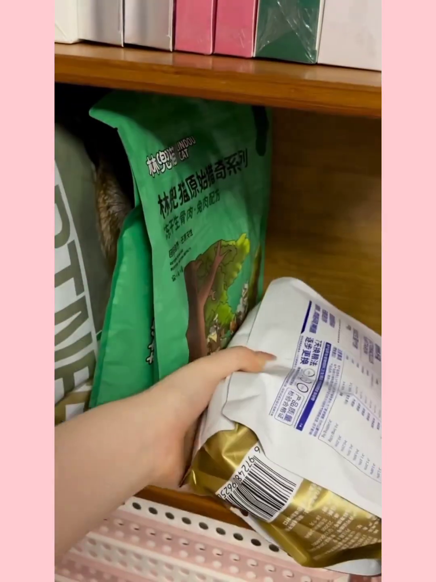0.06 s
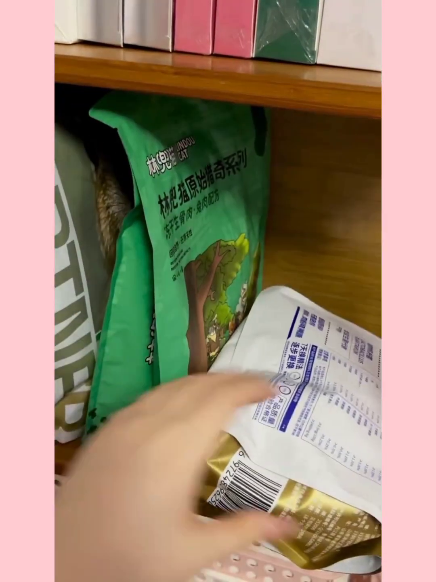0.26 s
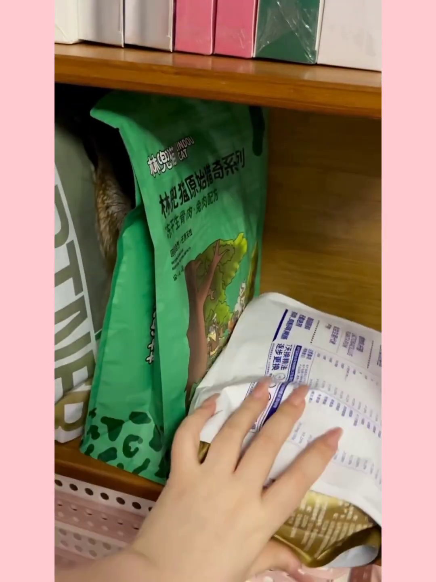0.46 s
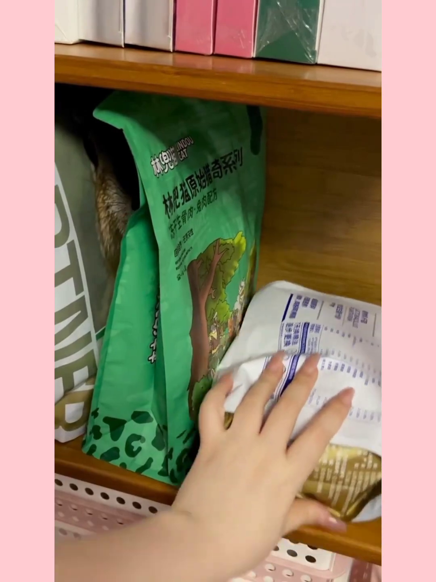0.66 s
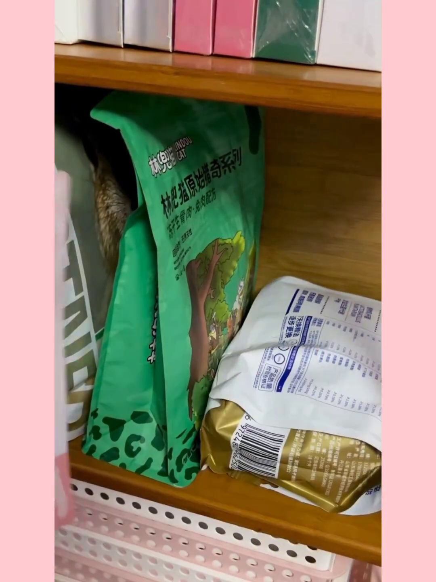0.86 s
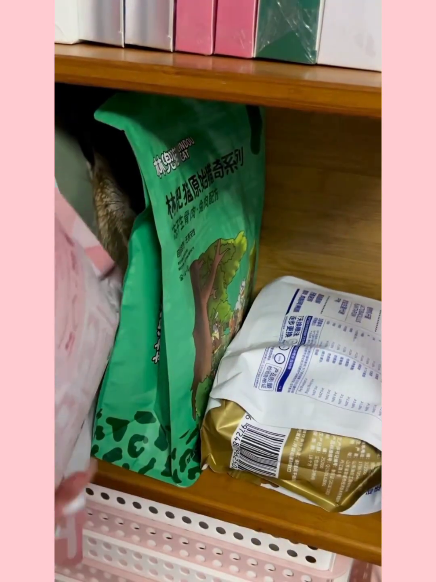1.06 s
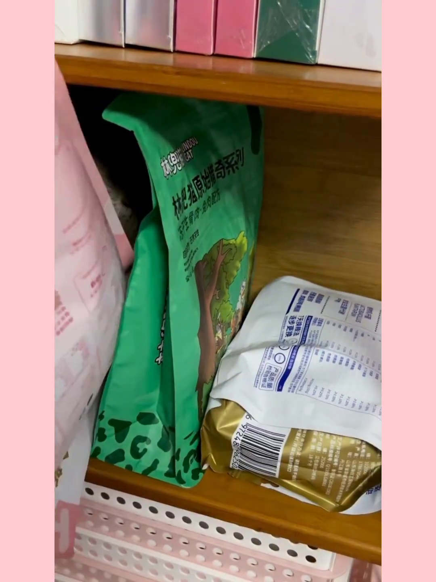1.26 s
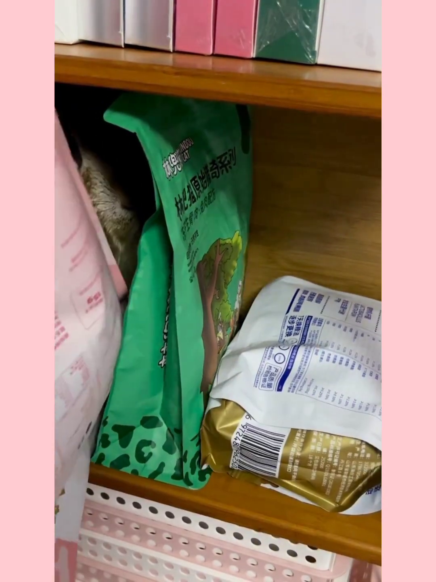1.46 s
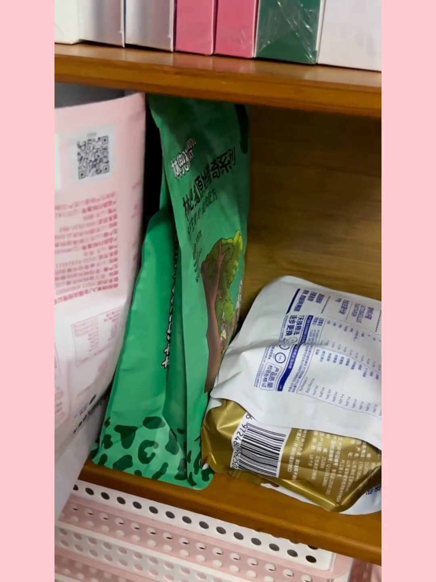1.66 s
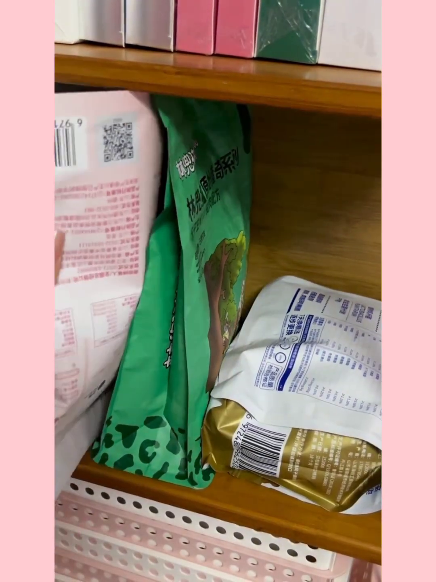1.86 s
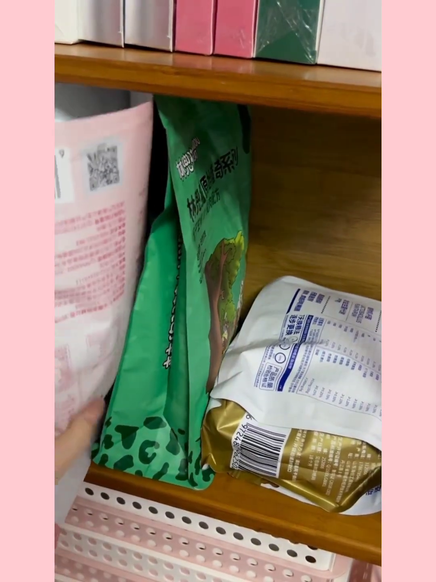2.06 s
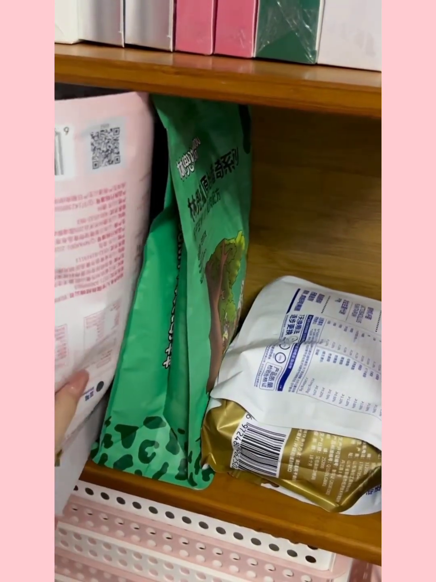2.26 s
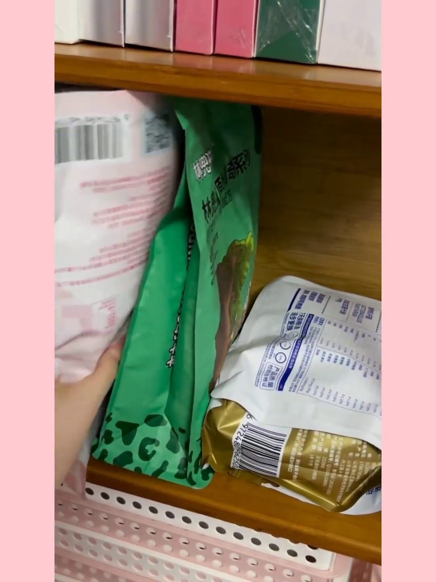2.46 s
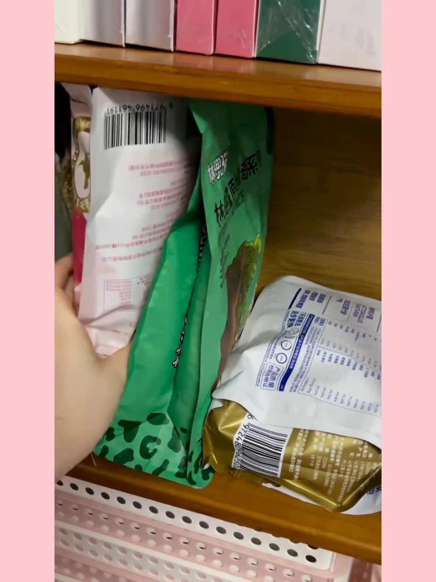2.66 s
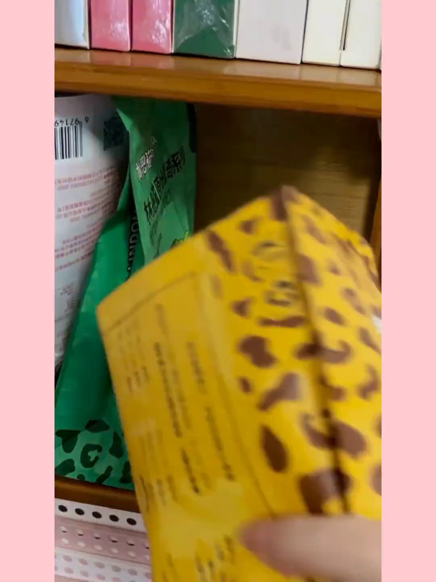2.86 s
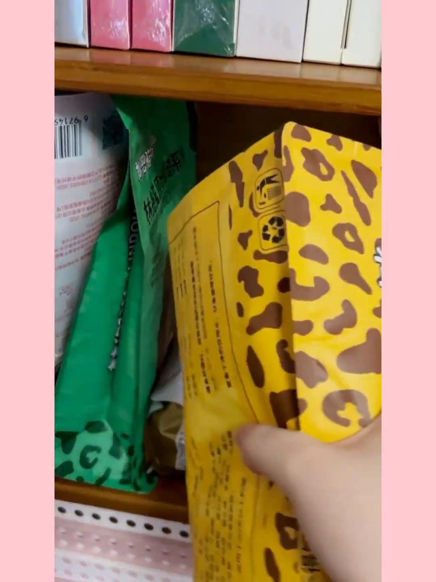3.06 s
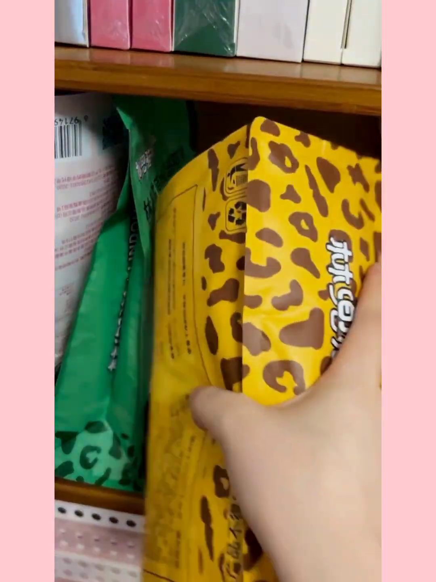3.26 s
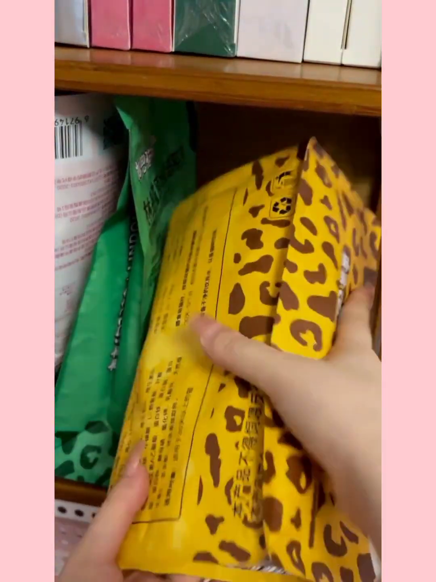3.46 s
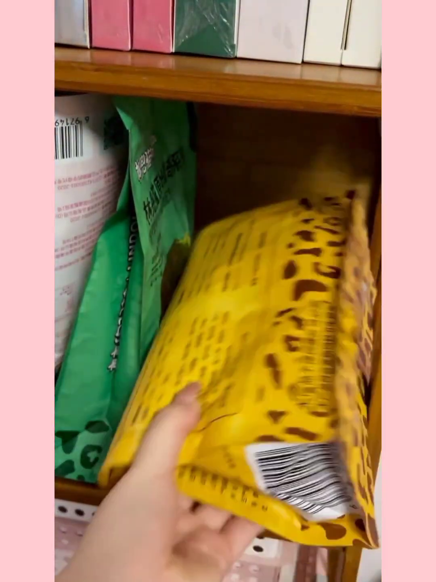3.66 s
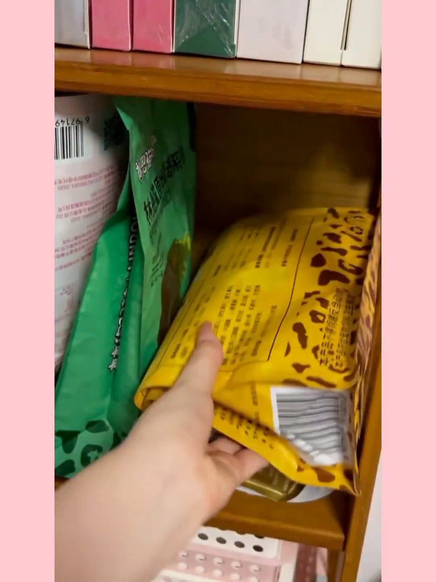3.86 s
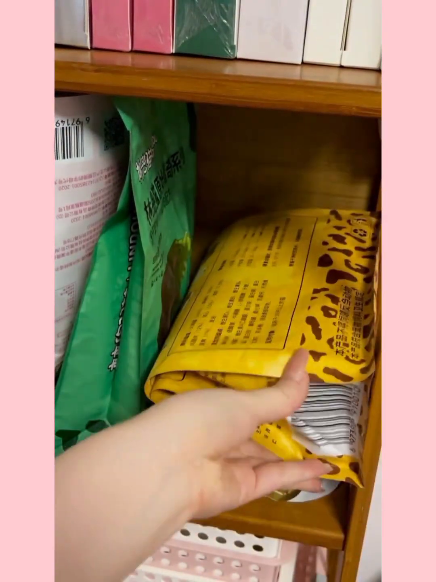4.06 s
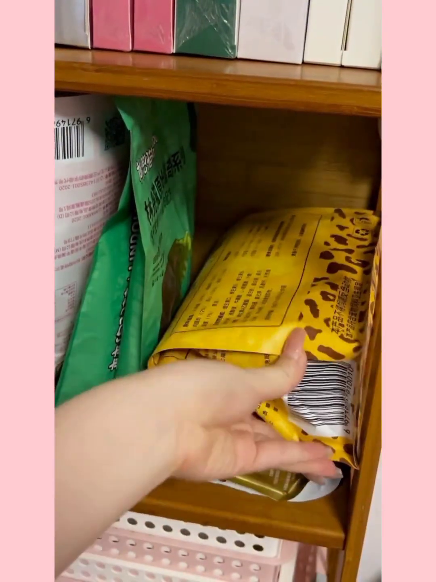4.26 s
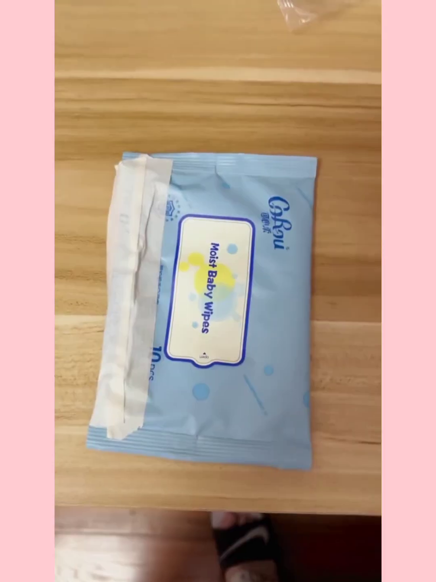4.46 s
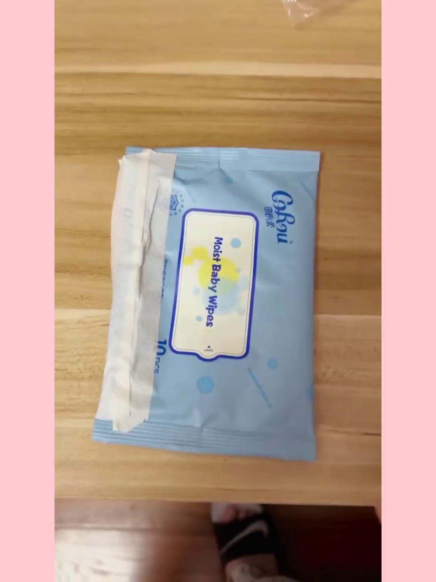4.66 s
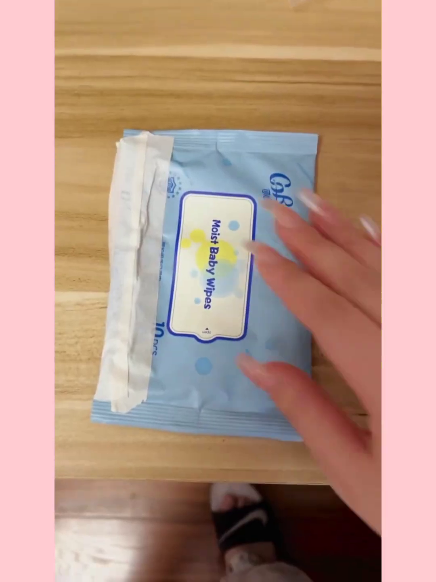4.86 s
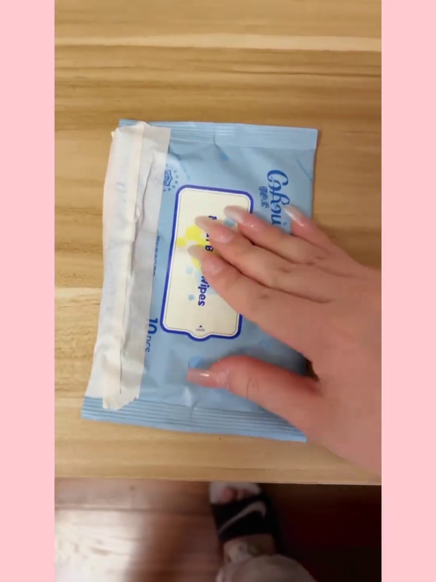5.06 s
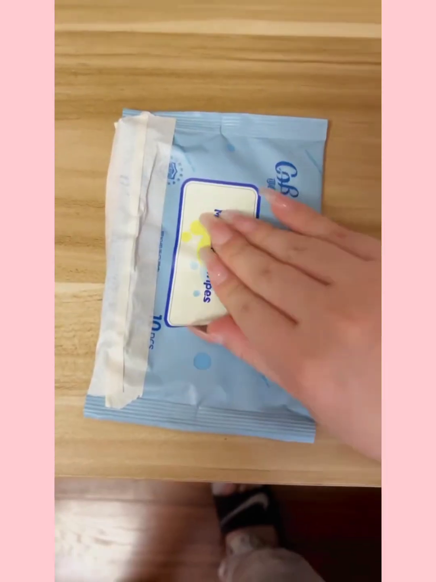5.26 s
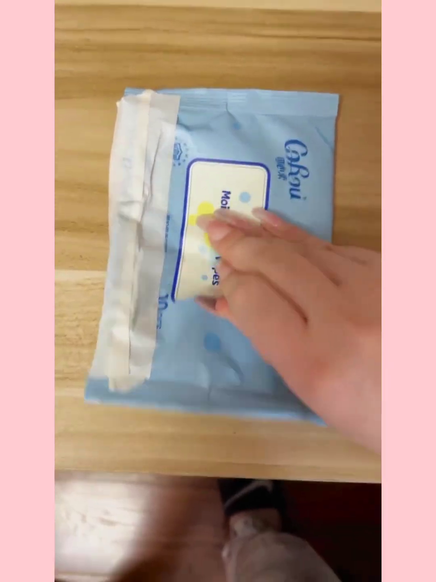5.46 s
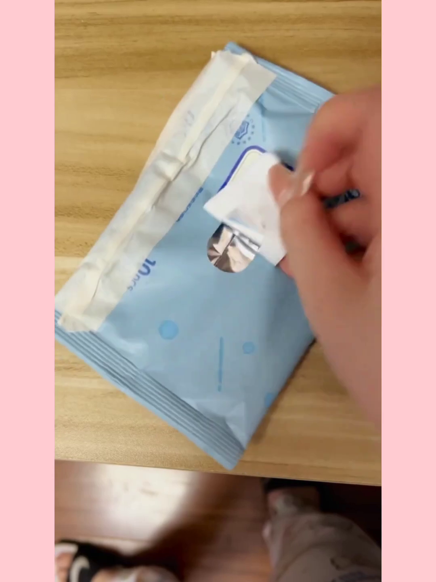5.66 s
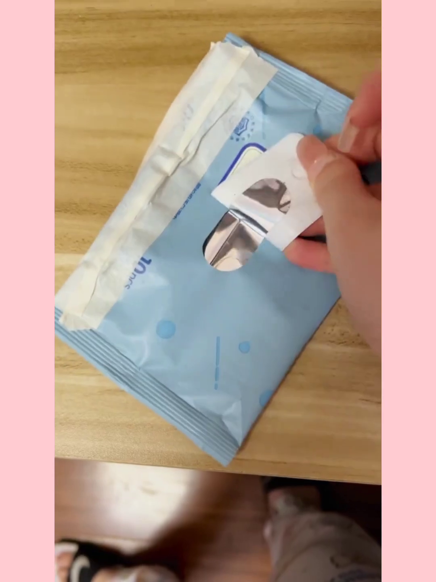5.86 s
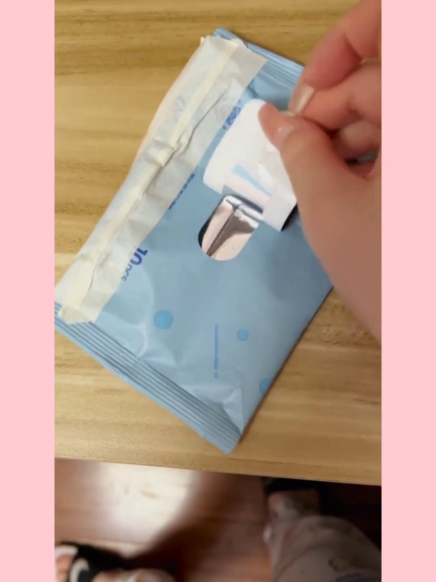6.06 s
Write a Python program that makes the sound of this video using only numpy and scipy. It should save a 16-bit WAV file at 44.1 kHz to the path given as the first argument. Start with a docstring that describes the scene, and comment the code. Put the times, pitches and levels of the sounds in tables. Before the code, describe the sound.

A close, dry, wide stereo take of plastic film handled in a quiet room with faint, bass-weighted still air. From 0 to 0.7 s, short light rustles come as a bag is touched on a wooden shelf, with a few snaps and a dull knock near 0.65. Low soft bumps follow around 0.8 and 0.94. From 1.05 to 2.9 s the crinkling is densest and loudest: irregular bursts of tiny clicks, sharp crease snaps, hollow booms of air-filled bags and muffled thuds. A thud at 3.0 leads into brighter rustling of another bag, swelling and dropping until it is set down around 4.0-4.4 with a small knock. Near silence lasts until 5.0. Then a small soft pack gives thin, higher, quieter crackles, clustered around 5.4-5.55, then sparse ticks and brief crinkles to about 6.1 s.

```python
"""Foil bags by hand, close up

A hand pushes foil bags about on a wooden shelf, then presses a small soft pack on a table, close to a phone.
The film rustles with swarms of tiny random clicks and snaps in short noise bursts now and then.
Air-filled bags and the shelf boom under it as damped modes, and soft low thuds are decaying sines.
The small pack has little body and crackles higher; faint still air lies behind, as coloured noise."""
import sys
import numpy as np
from scipy import signal
from scipy.io import wavfile
from scipy.ndimage import uniform_filter1d

SR = 44100
rng = np.random.default_rng(int(sys.argv[2]) if len(sys.argv) > 2 else 0)


def to_wav(sig):
    """Store sig (one row per channel, or 1-D mono) as 16-bit WAV at the path in sys.argv[1].

    Samples outside -1..1 are clipped; the rate is SR.
    """
    pcm = np.clip(np.atleast_2d(sig), -1, 1) * 32767
    pcm = np.round(pcm).astype(np.int16)
    wavfile.write(sys.argv[1], SR, pcm.T)  # frames by channels


N = 269451
PACK_FROM_S = 4.7  # bags before, the small pack after

# creases that snap; levels stand before the mix gains in snaps(): # peak_s [moment of the click, s], film_db
# [dB], tick_db [treble tick, dB above film_db], pitch_hz [patch of film, Hz]
CREASES = [(0.477, -13, 3.5, 1900), (0.582, -9.5, -7, 970), (0.654, -8, -32, 544), (0.796, -35, -3, 600),
           (0.869, -28.5, -17, 910), (1.111, -12.5, 0, 1730), (1.155, -12, -28, 1110),
           (1.218, -25, 3, 2560), (1.272, -9.5, -22, 1110), (1.307, -1.5, -17, 1940),
           (1.382, -6.5, -10, 2550), (1.432, -8.5, -3, 1250), (1.533, -3.5, -19, 694),
           (1.566, -7.5, -16, 2070), (1.657, -2.5, -27, 1280), (1.707, -16.5, 3, 580),
           (1.814, -11, -31, 540), (1.851, -11.5, 5, 1190), (1.92, -7.5, -2.5, 940),
           (2.013, -5.5, -9.5, 2660), (2.098, -8, -3.5, 890), (2.152, -9, -13, 610),
           (2.337, -9.5, -19, 2720), (2.374, -9, -1, 1600), (2.426, -5.5, -8, 1820),
           (2.478, -11.5, 1, 2200), (2.574, -14, 3.5, 1900), (2.687, -12.5, 1.5, 2910),
           (2.756, -9, -28, 840), (2.987, -9, -6.5, 1110), (3.033, -39, -6, 1480), (3.271, -28, 20, 2070),
           (3.307, -12, -1, 960), (3.4, -15.5, -31, 590), (3.441, -19.5, 9.5, 1460), (3.501, -12, 1, 1640),
           (3.598, -10, -4.5, 1700), (3.717, -11, 2, 1450), (3.768, -25, 11, 2800),
           (4.008, -12.5, -1.5, 2950), (4.166, -10, -0.5, 1120), (4.244, -13.5, 0.5, 1850),
           (4.397, -12, -3.5, 1650), (4.988, -17.5, 5.5, 2170), (5.027, -15.5, 2.5, 1820),
           (5.132, -16, -13, 2350), (5.148, -25.5, 14, 2460), (5.17, -29, 14, 2490),
           (5.226, -14, 2.5, 2420), (5.306, -27, 12.5, 2240), (5.385, -21, -14, 1600),
           (5.401, -17.5, 5.5, 1750), (5.409, -27, 11, 2000), (5.419, -28, 15, 1800),
           (5.438, -15.5, -1, 1800), (5.446, -15.5, 2, 2220), (5.492, -18.5, 1, 3000),
           (5.512, -8.5, -25, 2340), (5.524, -10.5, -4, 2280), (5.55, -30, 6, 2350), (5.616, -18, 8, 2370),
           (5.693, -14, -1, 3050), (5.766, -19, 7, 2300), (5.788, -21.5, -5, 3200), (5.838, -14, -1, 2320),
           (5.939, -17, -8, 1960), (6.051, -19.5, 6.5, 2420)]
# colour of the hiss of sliding film: freq_hz [Hz], level_db [relative dB per Hz]
HISS_COLOUR = [(1800, -26.5), (3000, 4), (7000, 3.5), (8300, 1), (8900, -5), (15500, -12)]
# modes of the air-filled bags: freq_hz [Hz], width_hz [Hz], level_db [relative dB]
BAG_MODES = [(279.6, 53, 2.5), (375, 110, 1), (475.5, 155, 3.5)]


def rustle():
    """One swarm of buckles drives the film, a finer one the hiss; slower shoves drive bags and shelf."""
    # mode of the board that the bags rub on: freq_hz [Hz], width_hz [Hz], level_db [relative dB]
    shelf_modes = [(127, 38, 0)]
    # topmost hiss for bags on the shelf, bag lifted in, bag set down, small pack: level_db [relative dB]
    sheen_levels = [-9, -3.5, -16, -11]
    on_shelf_until_s, set_down_s = 2.95, 3.98
    boom_lag_s = 0.0058  # the air and the board answer a little after the film

    t = np.arange(N) / SR
    film_db, slide_db, boom_db = handling_db()
    # the more the film slides, the brighter its hiss
    levels_db = [film_db, film_db + slide_db, boom_db, film_db + 3.6 * slide_db]
    film_gain, hiss_gain, boom_gain, sheen_gain = gain_of(levels_db + tension_db())

    swarm = buckles(per_s=900, spread_db=3.3, clump_db=2.5, smooth=0.8)
    fizz = buckles(per_s=3300, spread_db=0.0, clump_db=0.0, smooth=0.86)
    slow = buckles(per_s=250, spread_db=2.5, clump_db=4.0, smooth=1.0)

    shoves = np.interp(t - boom_lag_s, t, boom_gain) * (slow + 0.58 * swarm)
    board_share = np.where(t < on_shelf_until_s, 0.8, 0.12)
    air_share = np.where(t < PACK_FROM_S, 1, 0.3)  # the flat pack holds little air
    boom = body(air_share * shoves, BAG_MODES) - body(board_share * shoves, shelf_modes)
    boom = patchy(boom, depth_db=3.0, size=2048, count=3)

    place = np.searchsorted([on_shelf_until_s, set_down_s, PACK_FROM_S], t)
    sheen = gain_of(np.take(sheen_levels, place)) * sheen_gain * fizz
    hiss = through(hiss_gain * fizz, colour(HISS_COLOUR))
    hiss += resonate(sheen, np.full(N, 11500), width=5600)
    hiss = patchy(hiss, depth_db=3.0, size=512, count=40)
    return boom + patchy(film(film_gain * swarm, ring=0.88) + hiss, depth_db=2.5, size=512, count=3)


def handling_db():
    """Each push grips fast, swells or sags, and lets go; the strongest push rules. The boom lingers."""
    # pushes of the hand: start_s [s], length_s [s], rustle_db [at the start, dB],
    # swell_db [change by the end, dB], hiss_db [sliding film, dB above the rustle],
    # weight_db [boom under a middling rustle, dB]
    pushes = [(0.0, 0.14, -39, 6, 2, -41.5), (0.113, 0.11, -28.5, -21.5, -1.5, -38.5),
              (0.314, 0.17, -28.5, 2.5, -3, -42.5), (0.466, 0.2, -35, 4, 1, -38.5),
              (0.72, 0.076, -50.5, -7, -9, -21.5), (0.904, 0.041, -47, 0, -1.5, -33),
              (0.945, 0.087, -30, 3.5, 0, -33), (1.053, 0.12, -33, 8, -0.5, -36),
              (1.216, 0.088, -41.5, 25, -3, -39.5), (1.358, 0.017, -36, 9.5, -5, -42),
              (1.413, 0.1, -36, 1.5, -9.5, -37), (1.592, 0.25, -34, 10, -4, -34.5),
              (1.883, 0.037, -40, 16.5, -7, -37), (1.952, 0.2, -34.5, 9, -4, -36.5),
              (2.208, 0.016, -20.5, -1, -0.5, -48.5), (2.247, 0.14, -29.5, 5, -1, -40.5),
              (2.409, 0.23, -31.5, -2.5, 1, -32), (2.676, 0.077, -32, 1, -1, -33.5),
              (2.77, 0.29, -32, -18.5, -5, -36.5), (2.86, 0.022, -29, -2, -7, -46),
              (2.958, 0.17, -51.5, -1, -10, -27), (3.263, 0.09, -38, -2, 1, -34),
              (3.353, 0.18, -25.5, -1.5, -3, -36), (3.548, 0.16, -34, 11.5, -0.5, -35),
              (3.722, 0.16, -29.5, -0.5, -1.5, -34.5), (3.89, 0.099, -38, -12, -1, -38.5),
              (4.002, 0.056, -25.5, -6, -7.5, -39), (4.07, 0.093, -36.5, 6, -1, -34.5),
              (4.19, 0.073, -46, 0.5, -4, -30.5), (4.276, 0.011, -40.5, 8, -4, -33),
              (4.389, 0.02, -39, -2, -2, -58), (5, 0.089, -24, -25.5, 1.5, -43.5),
              (5.09, 0.057, -32, 3.5, -1.5, -46), (5.175, 0.21, -38, -5, 0, -43.5),
              (5.375, 0.1, -25.5, -8.5, -2, -68), (5.515, 0.0051, -32, -3.5, 8.5, -25.5),
              (5.541, 0.096, -48.5, 2, 4.5, -45), (5.629, 0.016, -29.5, 0.5, 7, -54),
              (5.649, 0.05, -36.5, -3.5, 4, -33), (5.683, 0.049, -49.5, 1, 6.5, -26),
              (5.775, .11, -45.5, 5, -1, -36), (5.947, 0.11, -42, -6.5, 3, -29.5),
              (6.103, 0.0097, -31, 16.5, 4, -53)]
    # instants that no push sounds across: time_s [s]
    cuts = [0.801, 0.938, 4.422]
    grip_db_per_s, let_go_db_per_s = 1486, 572.5
    middling_db = -35
    boom_follows = 0.89  # the boom moves by this share of the rustle's dB
    boom_fade_db_per_s = 263.5  # before that share is taken

    t = np.arange(0, N / SR + .002, .002)
    start, length, first_db, swell_db, hiss_db, weight_db = np.transpose(pushes)[:, :, None]
    held = first_db + swell_db * np.clip((t - start) / length, 0, 1)
    held -= grip_db_per_s * np.maximum(start - t, 0)
    same_side = np.searchsorted(cuts, t) == np.searchsorted(cuts, start)
    held = np.where(same_side, held, -100)

    after = np.maximum(t - start - length, 0)
    film_db = held - let_go_db_per_s * after
    slide_db = uniform_filter1d(hiss_db[film_db.argmax(axis=0), 0], size=10)
    boom_db = weight_db + boom_follows * (held - boom_fade_db_per_s * after - middling_db)
    curves = (film_db.max(axis=0), slide_db, boom_db.max(axis=0))
    return [np.interp(np.arange(N) / SR, t, c) for c in curves]


def tension_db():
    """The rustle swells as a crease loads up and slackens once it has snapped."""
    t = np.arange(-3000, 3001) / SR
    cycle = np.where(t < .002, 2.7 * np.exp(t / 0.012), -5.0 * np.exp(-t / 0.013))
    moments = np.bincount([round(row[0] * SR) for row in CREASES], minlength=N)
    return signal.oaconvolve(moments, cycle, "same")


def buckles(per_s, spread_db, clump_db, smooth):
    """Tiny buckles: random clicks, a few large when spread, coming in clumps, over a smooth rub."""
    sizes = gain_of(spread_db * np.minimum(rng.exponential(1, N), 3.4)) * rng.choice([-1, 1], N)
    clicks = evened(sizes * (rng.random(N) < per_s / SR))
    clumps = evened(uniform_filter1d(uniform_filter1d(rng.standard_normal(N), 500), 500))
    return evened((clicks + smooth * rng.standard_normal(N)) * gain_of(clump_db * clumps))


def snaps():
    """A crease creeps, gives way with one sharp click in a burst of a few ms; the boom follows a little later."""
    bag_boom_db, pack_boom_db = -12.5, -32  # above film_db before the mix gains, for a crease at 1 kHz
    boom_db_per_octave = -5.5  # large, low-pitched creases shove more air

    t = np.arange(-800, 1200) / SR
    chance = rng.standard_normal((len(CREASES), 3, len(t)))

    def burst(rise_s, fall_s):
        """Exponential rise to the moment of the snap, exponential fall after it."""
        return np.where(t < 0, np.exp(t / rise_s), np.exp(-t / fall_s))

    crack = burst(0.0024, 0.0025) + 0.43 * burst(0.0012, 0.0086)
    shove = np.roll(burst(0.00013, 0.0009), 90)  # 2 ms late
    click = np.outer([10., 10., 0], t == 0) + [[0], [0], [1.5]] * shove

    drive = np.zeros((3, N + len(t)))  # rows: film, tick, boom
    for (s, film_db, tick_db, hz), noise in zip(CREASES, chance):
        boom_db = bag_boom_db if s < PACK_FROM_S else pack_boom_db
        boom_db += boom_db_per_octave * np.log2(hz / 1000)
        parts = noise * [crack, crack, shove] + click
        parts /= np.linalg.norm(parts, axis=1, keepdims=True)
        at = round(s * SR)
        drive[:, at:at + len(t)] += gain_of(film_db + np.array([[0], [tick_db], [boom_db]])) * parts
    film_drive, tick_drive, boom_drive = drive[:, 800:N + 800]

    tick = through(tick_drive, colour(HISS_COLOUR)) + 0.1 * high_pass(tick_drive, 11000, order=4)
    boom = body(boom_drive, BAG_MODES)
    return gain_of(14.0) * film(film_drive, ring=1.31) + gain_of(15.0) * tick + gain_of(16.0) * boom


def film(x, ring):
    """A broad colour plus the pitch of the patch that snaps nearest in time; the small pack rings more."""
    # colours of the bags' and the pack's film: freq_hz [Hz], level_db [relative dB per Hz]
    bag_colour = [(400, -25.5), (650, 0.5), (1100, 0.5), (2600, -0.5), (3200, -16.5), (5000, -50.5)]
    pack_colour = [(400, -18.5), (1050, -7.5), (1500, -1.5), (3000, -1), (5000, -43)]
    t = np.arange(N) / SR
    s, *_, hz = np.transpose(CREASES)
    on_pack = t > PACK_FROM_S
    broad = through(x * ~on_pack, colour(bag_colour)) + through(x * on_pack, colour(pack_colour))
    nearest = np.searchsorted((s[1:] + s[:-1]) / 2, t)
    patch = resonate(broad, hz[nearest], width=194)
    return broad + ring * np.where(on_pack, 2.4, 1.1) * patch


def body(x, modes):
    """Damped modes ring together; things this small radiate little low down, so the bass is cut."""
    t = np.arange(3000) / SR
    ring = np.zeros(len(t))
    for hz, width, db in modes:
        ring += gain_of(db) * np.sqrt(width) * np.exp(-np.pi * width * t) * np.sin(2 * np.pi * hz * t)
    ring = high_pass(ring, 1.3 * modes[0][0], order=2)
    return through(x, ring / np.linalg.norm(ring))


def patchy(x, depth_db, size, count):
    """The ringing shape keeps changing: bands `count` bins wide swell and fade at random."""
    z = signal.stft(x, nperseg=size, noverlap=size * 3 // 4)[2]
    field = uniform_filter1d(rng.standard_normal(z.shape), count, axis=0)
    field = evened(uniform_filter1d(field, size=8, axis=1))
    z = z * evened(gain_of(depth_db * field))
    return signal.istft(z, nperseg=size, noverlap=size * 3 // 4)[1][:N]


def thuds():
    """A soft push: a sine that rises gently and dies within a few cycles."""
    # dull thuds and knocks of the bags on shelf and table: start_s [s], peak_db [envelope, dB], pitch_hz [Hz]
    knocks = [(0.802, -39, 58.7), (0.654, -15.5, 436), (0.94, -14.5, 185), (1.173, -12, 259),
              (1.568, -13, 332), (1.848, -15, 286), (2.104, -13.5, 138), (2.987, -10.5, 288),
              (4.132, -33, 78.8), (4.138, -16.5, 537)]
    rise_cycles, fall_cycles = 0.97, 1.9
    t, out = np.arange(6000) / SR, np.zeros(N + 6000)
    for s, db, hz in knocks:
        shape = (1 - np.exp(-t * hz / rise_cycles)) * np.exp(-t * hz / fall_cycles)
        out[round(s * SR):][:len(t)] += gain_of(db) * shape / shape.max() * np.sin(2 * np.pi * hz * t)
    return out[:N]


def still_air():
    """Steady noise, weighted to the bass, for the quiet room."""
    # colour of the still air: freq_hz [Hz], level_db [relative dB per Hz]
    air_colour = [(40, -2.5), (127, -5.5), (460, -19.5), (7700, -33.5), (16000, -51)]
    level_db = -54.5
    return gain_of(level_db) * through(rng.standard_normal(N), colour(air_colour))


def between_microphones(mid, size):
    """The source is wide and always moving: the side signal shares the envelope but not the fine phase."""
    # stereo width: freq_hz [Hz], side_db [dB above mid]
    width = [(60, -10), (250, -18.5), (700, -3.5), (1500, -8.5), (5000, -2.5)]
    hz, _, z = signal.stft(mid, SR, nperseg=size, noverlap=size * 3 // 4)
    scattered = z * np.exp(2j * np.pi * rng.random(z.shape))
    z = 2 * scattered * gain_of(read(width, hz))[:, None]  # 2: random phases halve the overlapped sum
    return signal.istft(z, nperseg=size, noverlap=size * 3 // 4)[1][:N]


def gain_of(db):
    """Amplitude factor of a level in dB."""
    return 10 ** (np.asarray(db) / 20)


def evened(x):
    """Scales to an RMS of 1."""
    return x / np.sqrt(np.mean(x ** 2) + 1e-20)


def read(points, hz):
    """Reads a curve of (Hz, value) points along log frequency."""
    f, value = np.transpose(points)
    return np.interp(np.log(hz + 1), np.log(f + 1), value)


def colour(points, size=4096):
    """Causal minimum-phase filter of energy 1 with the given spectrum."""
    log_gain = np.log(gain_of(read(points, abs(np.fft.fftfreq(size, 1 / SR)))))
    taps = np.fft.ifft(np.exp(log_gain - 1j * signal.hilbert(log_gain).imag)).real[:size // 2]
    return taps / np.linalg.norm(taps)


def through(x, taps):
    """Filters x with the taps and keeps its length."""
    return signal.oaconvolve(x, taps)[:len(x)]


def resonate(x, hz, width):
    """Shifts the curve hz down to zero, smooths, and shifts back: a moving resonance."""
    turn = np.exp(2j * np.pi * np.cumsum(hz) / SR)
    r = np.exp(-np.pi * width / SR)
    return 2 * (turn * signal.lfilter([1 - r], [1, -r], x / turn)).real


def high_pass(x, hz, order):
    """Butterworth filter that takes away what lies below hz."""
    return signal.sosfilt(signal.butter(order, hz, "high", fs=SR, output="sos"), x)


def scene():
    """Bags, pack and still air at two microphones."""
    mid = rustle() + snaps() + thuds()  # so close that the walls add nothing
    mid += still_air()
    side = high_pass(between_microphones(mid, size=256), 90, order=3)  # the side carries no deep bass
    return np.array([mid + side, mid - side])


def record(dry):
    """Soft overload on the loudest snaps, then the band limit."""
    edge_hz = 15850
    soft = np.tanh(dry)
    taps = signal.firwin(511, edge_hz, window=("kaiser", 9), fs=SR)
    return signal.oaconvolve(soft, taps[None], "same")


dry = scene()
out = record(dry)
to_wav(out)
```